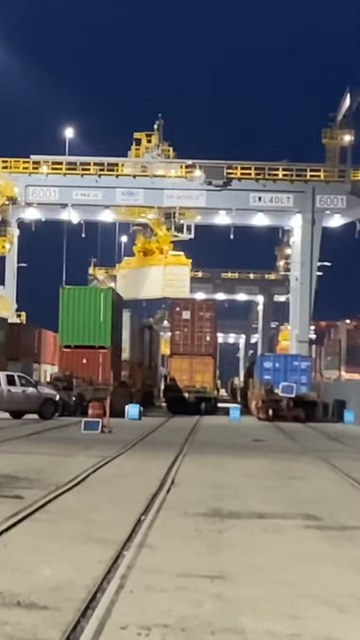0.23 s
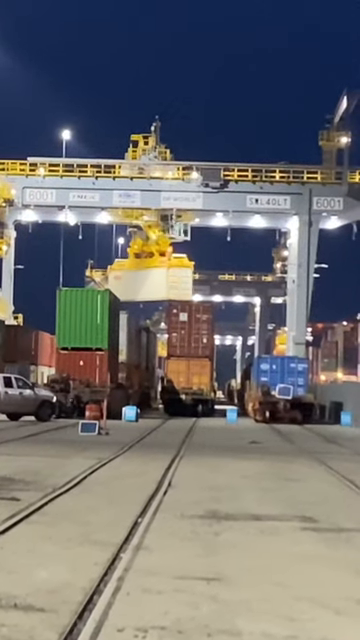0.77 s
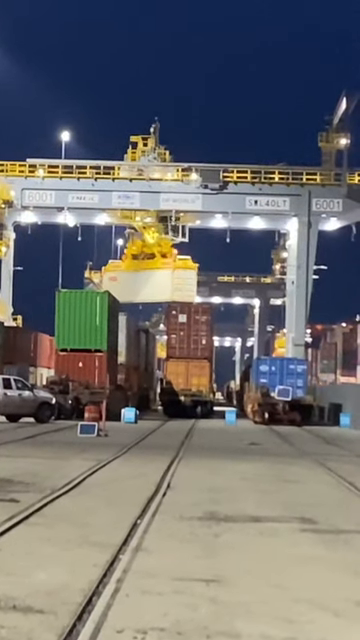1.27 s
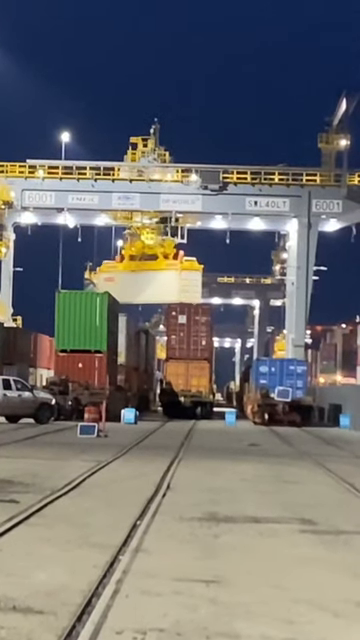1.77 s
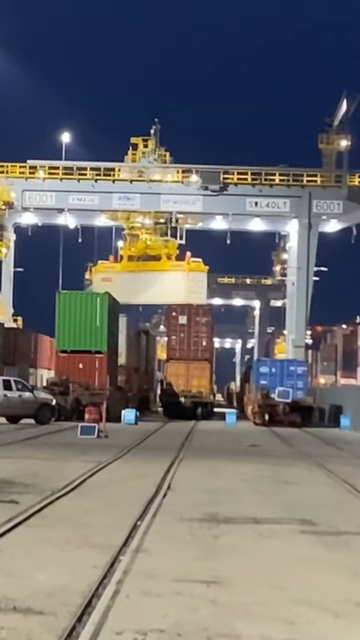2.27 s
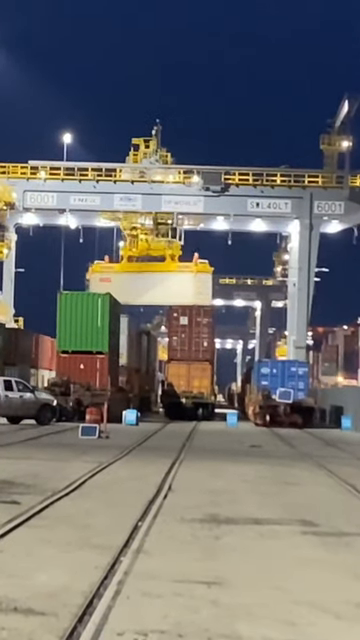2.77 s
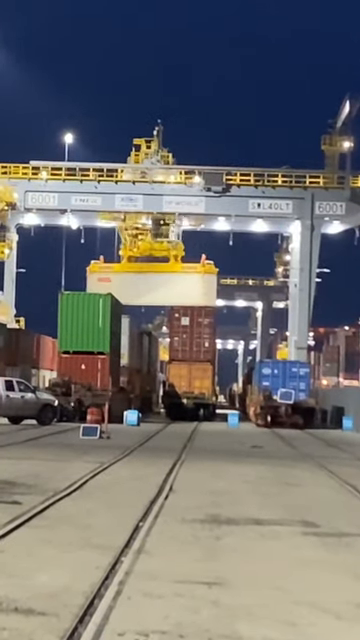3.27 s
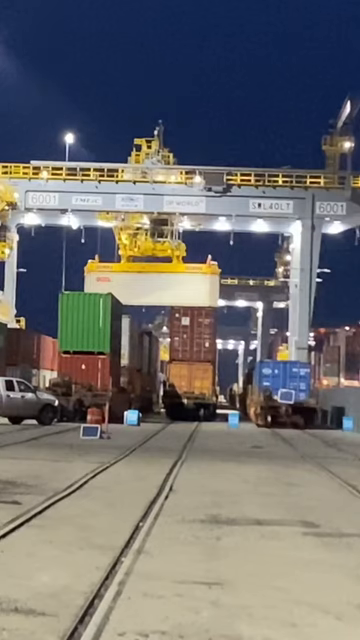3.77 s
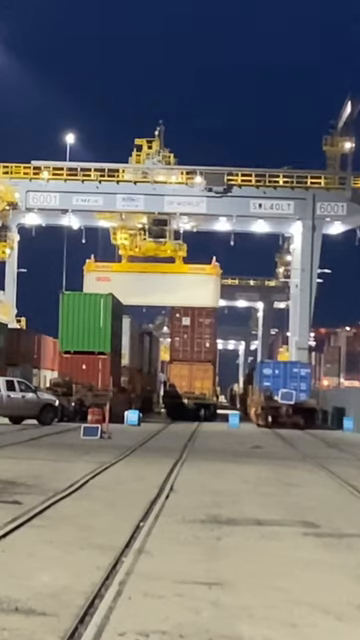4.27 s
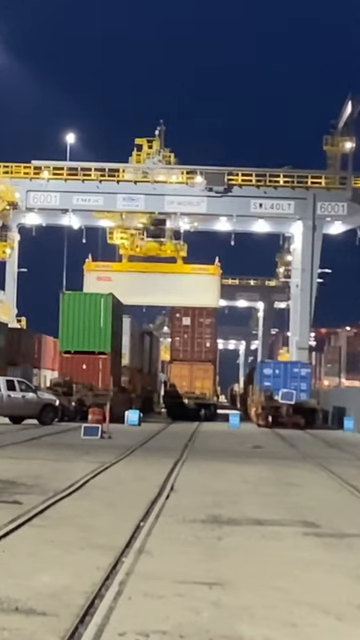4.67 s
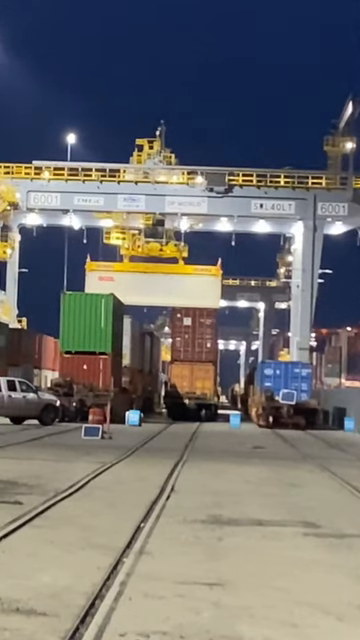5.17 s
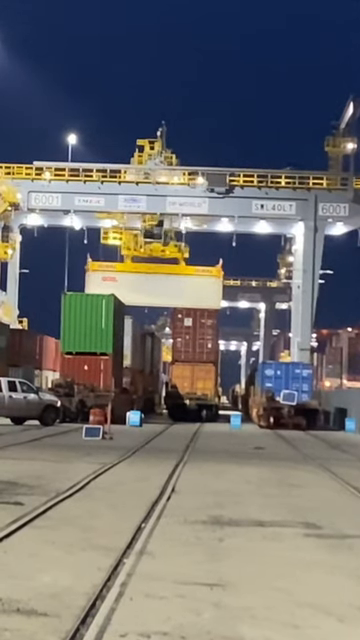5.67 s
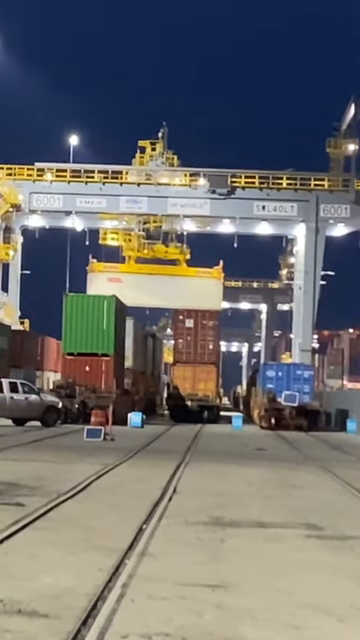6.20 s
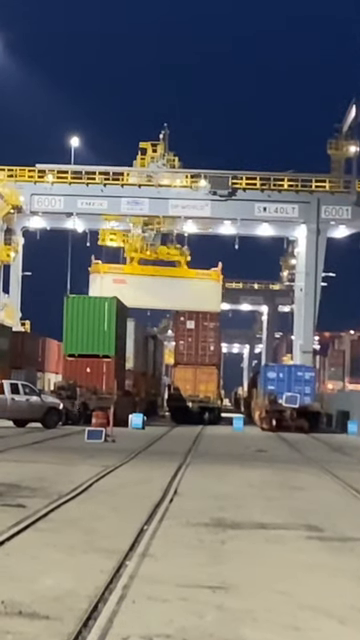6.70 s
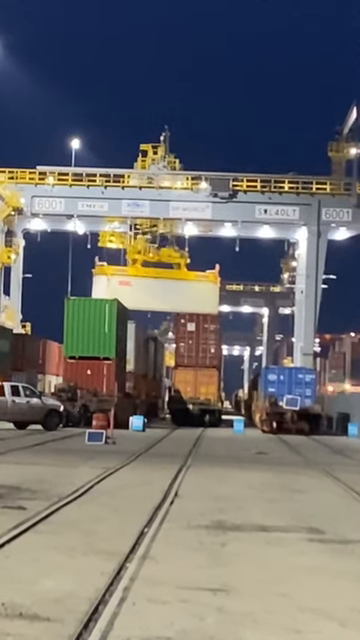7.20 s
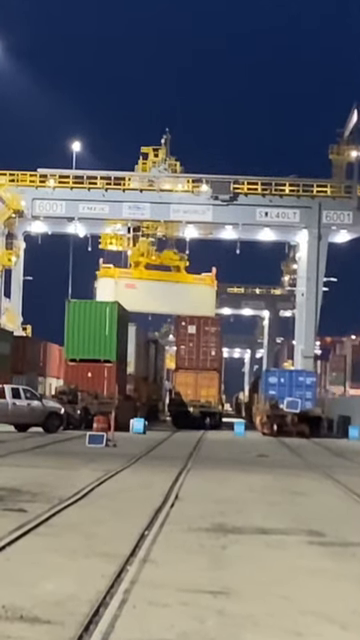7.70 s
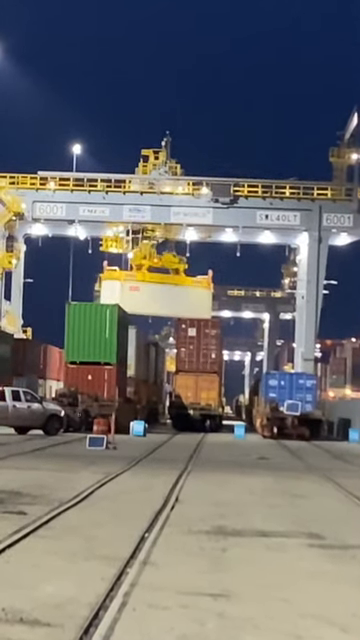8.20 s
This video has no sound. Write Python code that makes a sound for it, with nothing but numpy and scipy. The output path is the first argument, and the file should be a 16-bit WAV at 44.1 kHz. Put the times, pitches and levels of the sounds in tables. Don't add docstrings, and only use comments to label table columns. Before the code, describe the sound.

Steady, dense crane machinery outdoors, captured in stereo from a distance. A constant-speed diesel drone dominates, roughened by rapid irregular knocks and weak valve rattle, with whining gears, electric motors and a hydraulic pump blended in. Low roar and cooling-air hiss sway only slightly. A soft belt swish pulses nearly five times a second. Extremely high, fluttering rail squeals start faintly, return as short chirps midway, then one stronger whistle rises and stops abruptly.

```python
import sys
import numpy as np
from scipy import signal
from scipy.fft import rfft, irfft, next_fast_len
from scipy.io import wavfile
from scipy.ndimage import uniform_filter1d, map_coordinates

SR = 44100
rng = np.random.default_rng(int(sys.argv[2]) if len(sys.argv) > 2 else 0)


def elevation(decibels):
    levels = np.asarray(decibels, float)
    return 10 ** (levels / 20)


def to_wav(sig):
    pcm = np.clip(np.atleast_2d(sig), -1, 1) * 32767
    pcm = np.round(pcm).astype(np.int16)
    wavfile.write(sys.argv[1], SR, pcm.T)


N = 372644


def wobble(rate):
    knots = rng.standard_normal(int(N * rate / SR) + 4)
    return map_coordinates(knots, [np.arange(N) * rate / SR])


def filtered(x, response):
    edge = SR // 10
    long = np.pad(x, [(0, 0)] * (x.ndim - 1) + [(edge, edge)], "reflect")
    m = next_fast_len(N + SR // 2)
    spectrum = rfft(long, m) * response(np.fft.rfftfreq(m, 1 / SR))
    return irfft(spectrum, m)[..., edge:edge + N]


def peaks(modes, hz):
    total = 0
    for k, (centre, width, db) in enumerate(modes):
        damping = 1j * hz * width
        total = total + (-1) ** k * elevation(db) * damping / (centre ** 2 - hz * hz + damping + 1e-9)
    return total


def noise(spectrum, patchy_db, ripple_db):
    z = signal.stft(rng.standard_normal((2, N + SR // 10)), nperseg=512)[2]
    field = uniform_filter1d(rng.standard_normal(z.shape[1:]), size=6, axis=0)
    field = uniform_filter1d(field, size=12, axis=1)
    ripple = rng.standard_normal((len(field), 1))
    gain = elevation(patchy_db * field / field.std() + ripple_db * ripple)
    pair = signal.istft(z * gain, nperseg=512)[1][:, :N]
    f, db = np.transpose(spectrum)
    colour = lambda hz: elevation(np.interp(np.log(hz + 1), np.log(f), db)) * np.sqrt(SR / 2)
    return filtered(pair, colour)


def over_bed(modes):
    return lambda hz: np.sqrt(1 + np.abs(peaks(modes, hz)) ** 2)


def tones(lines, phase, unsteady_db, drift):
    total = np.zeros(N)
    for k, db, shift in lines:
        level = np.sqrt(2) * elevation(db + unsteady_db * wobble(5))
        total += level * np.cos(k * phase + shift + drift * wobble(2.957))
    return total


def any_phase(lines):
    return [(k, db, rng.uniform(0, 2 * np.pi)) for k, db in lines]


# (f/Hz, level/dB per Hz)
RUMBLE_COLOUR = [(20, -90), (30, -76), (42, -65), (56, -52), (110, -52.5), (200, -54), (300, -58.5),
                 (400, -61.5), (500, -64.5), (620, -68.5), (950, -68.5), (1100, -70.5), (1500, -76),
                 (2200, -120)]
# (f/Hz, level/dB per Hz)
HISS_COLOUR = [(900, -120), (1300, -76), (2000, -76), (2500, -78.5), (3000, -83), (4200, -85),
               (5200, -87.5), (5900, -93.5), (7500, -92), (9900, -94), (11000, -97), (13500, -97),
               (15750, -100), (16500, -120)]
# (f/Hz, width/Hz, level/dB over the hiss)
DUCT_MODES = [(1543, 25, 3), (1679, 35, 8), (1810, 47, 3), (2235, 200, -2.5)]


def roar():
    load_db = 0.38 * wobble(0.69)
    hiss = filtered(noise(HISS_COLOUR, patchy_db=0.86, ripple_db=1.18), over_bed(DUCT_MODES))
    breathe_db = -0.22 + 0.4 * load_db + 0.33 * wobble(5)
    rumble = noise(RUMBLE_COLOUR, patchy_db=0.77, ripple_db=0.4)
    return elevation(load_db) * rumble + elevation(breathe_db) * hiss


# (f/Hz, level/dB per Hz)
BELT_COLOUR = [(2500, -120), (3200, -99), (4200, -96), (5300, -95), (6300, -101), (7600, -100),
               (10000, -103), (13000, -120)]
# (f/Hz, width/Hz, level/dB over the swish)
PULLEY_MODES = [(4400, 250, 1.5), (5170, 90, 6), (5360, 50, 7), (5770, 100, 6), (6100, 200, 1.5)]
BELT_HZ = 4.79


def belt():
    t = np.arange(N) / SR
    each_turn = np.sqrt(1 + np.cos(2 * np.pi * BELT_HZ * t - 0.5))
    nearer_db = 0.4 * (t - 4)
    swish = each_turn * elevation(nearer_db + 1.2 * wobble(25))
    rub = swish * noise(BELT_COLOUR, patchy_db=2.0, ripple_db=-1.0)
    return filtered(rub, over_bed(PULLEY_MODES))


# (f/Hz, level/dB)
MOTOR_LINES = [(37.3, -44), (75.4, -46), (115.7, -44), (118.4, -46), (154.1, -48), (177.6, -50),
               (198.5, -43), (231.8, -49), (250, -53), (345.9, -51), (406.8, -54), (794.7, -53.5),
               (1006.7, -56), (3618, -71)]
# (multiple of its beat, level/dB)
PUMP_LINES = [(4, -39), (6, -52), (8, -52), (9, -58.5), (12, -58), (16, -55), (30, -67)]
PUMP_HZ = 72.085


def motors():
    turn = 2 * np.pi * np.arange(N) / SR
    pump = [(k * PUMP_HZ, db) for k, db in PUMP_LINES]
    return tones(any_phase(MOTOR_LINES + pump), turn, unsteady_db=2.5, drift=0.3)


# (start t/s, length/s, f/Hz, level/dB at the end, gain/dB on the way)
FLANGE_SQUEALS = [
    (-.1, 1.52, 14375, -69, 1),
    (1.5, .36, 14325, -70, 3),
    (4.56, .12, 14140, -71, 6),
    (4.77, .27, 14125, -59.5, 7),
    (5.12, .07, 14140, -63, 4),
    (5.22, .16, 14155, -73, -3),
    (5.5, .14, 14210, -73, 6),
    (6.66, .33, 14218, -55.5, 7),
]
GRIP_S, SLIP_DB_PER_S = 0.03, 170


def squeal():
    t, out = np.arange(N) / SR, np.zeros(N)
    blur = 2 * np.pi * np.cumsum(45 * wobble(250)) / SR
    flutter = elevation(6 + 4.2 * wobble(70))
    for start, length, hz, db, build_db in FLANGE_SQUEALS:
        phase = 2 * np.pi * hz * t + blur
        rise_db = build_db * (np.clip((t - start) / length, 0, 1) - 1)
        fall_db = SLIP_DB_PER_S * np.maximum(t - start - length, 0)
        grip = np.clip((t - start) / GRIP_S, 0, 1)
        octave_down = elevation(-19 + 1.3 * start) * np.sin(phase / 2)
        out += grip * elevation(db + rise_db - fall_db) * flutter * (np.sin(phase) + octave_down)
    return out


# (multiple of the engine cycle, level/dB)
GEAR_LINES = [(21, -47), (24, -45), (26, -46), (38, -51), (42, -46), (43, -49), (46, -51.5), (50, -56.5),
              (54, -56.5), (58, -58.5), (68, -54), (136, -52.5), (138, -46.5), (168, -70)]


def gear_teeth(crank):
    return tones(any_phase(GEAR_LINES), crank, unsteady_db=2.0, drift=0.47)


def valve_clatter(crank):
    one_cycle = rng.standard_normal(512)
    rattle = one_cycle[(crank / (2 * np.pi) % 1 * 512).astype(int)]
    return elevation(-41) * filtered(rattle, lambda hz: peaks([(800, 650, 0)], hz) ** 2)


CYCLE_HZ = 10.6224
START = 0.001592
CYLINDER_KNOCKS = [
    (.1329, .618),
    (.1945, .259),
    (.3869, -.329),
    (.4197, .143),
    (.6321, -.587),
    (.6937, -.131),
    (.8988, -.24),
    (.9803, -.15),
]
# (f/Hz, width/Hz, level/dB)
STACK_MODES = [(262.4, 62, -1.67), (347, 113.6, .66), (467.7, 100.7, -4.9)]


def exhaust_knocks():
    place, strength = np.transpose(CYLINDER_KNOCKS)
    cycles = np.arange(-1, int(N / SR * CYCLE_HZ) + 1)[:, None]
    scatter = rng.standard_normal((len(cycles), len(place), 2))
    blow_s = START + (cycles + place) / CYCLE_HZ + 0.00008 * scatter[..., 0]
    at = np.round(SR * blow_s).astype(int)
    size = strength * elevation(1.16 * scatter[..., 1])
    inside = (at >= 0) & (at < N)
    blows = np.bincount(at[inside], size[inside], N)
    return elevation(36.0) * filtered(blows, lambda hz: peaks(STACK_MODES, hz) ** 2)


# (multiple of the engine cycle, level/dB)
FIRING_ORDERS = [(4, -29.5), (6, -49), (7, -48), (8, -40), (9, -49), (10, -42), (11, -48), (12, -31),
                 (13, -50), (14, -45), (16, -24), (17, -43), (18, -38), (20, -34.5)]


def firing_hum(crank):
    lines = []
    for k, db in FIRING_ORDERS:
        silencer = 1.05 * (1 + np.tanh(k - 14))
        halfway = np.pi / 2 * (k % 4 == 2)
        lines.append((k, db, 0.376 * k - 1.8 + silencer + halfway))
    return tones(lines, crank, unsteady_db=0.76, drift=0.084)


def engine():
    crank = 2 * np.pi * CYCLE_HZ * (np.arange(N) / SR - START)
    return firing_hum(crank) + gear_teeth(crank) + exhaust_knocks() + valve_clatter(crank)


# (f/Hz, left lead/rad, left-right level/dB, likeness/0-1)
MIC_PORTS = [(0, 0, 1.5, .99), (250, .45, 1.8, .98), (420, 1.01, 2.8, .96), (650, .6, 6, .55),
             (950, 1.1, 5, .55), (1100, 2.6, 2.1, .5), (1550, 2.3, -4, .45), (1750, 5.2, 2.1, .3),
             (2100, 6.3, -1.2, .88), (3400, 6.28, 0, .99), (6750, 6.28, 0, .85), (15750, -6.6, 0, .8)]


def ports(direct, diffuse):
    f, lead, tilt_db, alike = np.transpose(MIC_PORTS)
    side = np.array([[1], [-1]])

    def place(hz):
        level = elevation(side * np.interp(hz, f, tilt_db) / 2)
        return level * np.exp(0.5j * side * np.interp(hz, f, lead))

    def turn(hz):
        return np.arccos(np.clip(np.interp(hz, f, alike), 0, 1)) / 2

    shared = filtered(diffuse[0], lambda hz: place(hz) * np.cos(turn(hz)))
    apart = filtered(diffuse[1], lambda hz: place(hz) * side * np.sin(turn(hz)))
    return filtered(direct, place) + shared + apart


def scene():
    return ports(engine() + motors() + squeal(), roar() + belt())


def top_cut(x):
    return signal.sosfilt(signal.butter(12, 16550, fs=SR, output="sos"), x)


# (from f/Hz, to f/Hz)
DIFFERENCE_BANDS = [(0, 3450), (7550, 10450), (11700, 14500)]
# (from f/Hz, to f/Hz)
SUM_GAPS = [(8800, 9250), (13050, 13750), (15760, 22050)]
# (from f/Hz, to f/Hz, level/dB over usual)
FAINT_SUM_BANDS = [(8300, 8550, -1), (8550, 8800, .5), (9250, 9600, 1.3), (12500, 12750, .8),
                   (12750, 13050, 1.7), (13750, 13900, -1.2)]


def record(dry):
    within = lambda hz, bands: sum((hz >= lo) & (hz < hi) for lo, hi in bands)
    side = filtered(dry[0] - dry[1], lambda hz: within(hz, DIFFERENCE_BANDS)) / 2
    hz, _, z = signal.stft((dry[0] + dry[1]) / 2, SR, nperseg=2048)
    power = lambda lo, hi: np.sum(np.abs(z[(hz >= lo) & (hz < hi)]) ** 2, axis=0)
    keep = np.outer(1.0 - within(hz, SUM_GAPS), np.ones(z.shape[1]))
    for lo, hi, db in FAINT_SUM_BANDS:
        band = power(lo, hi)
        keep[(hz >= lo) & (hz < hi)] = band > np.median(band) * elevation(db) ** 2
    whistle = power(13900, 14450)
    for lo, hi in [(14480, 14800), (14800, 15150), (15150, 15450), (15450, 15760)]:
        keep[(hz >= lo) & (hz < hi)] = whistle < elevation(10.5) ** 2 * power(lo, hi)
    mid = signal.istft(z * keep, SR, nperseg=2048)[1][:N]
    return top_cut(np.array([mid + side, mid - side]))


dry = scene()
out = record(dry)
to_wav(out)
```